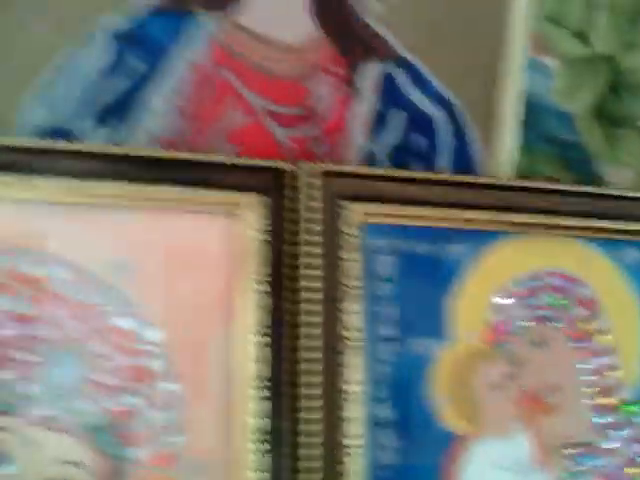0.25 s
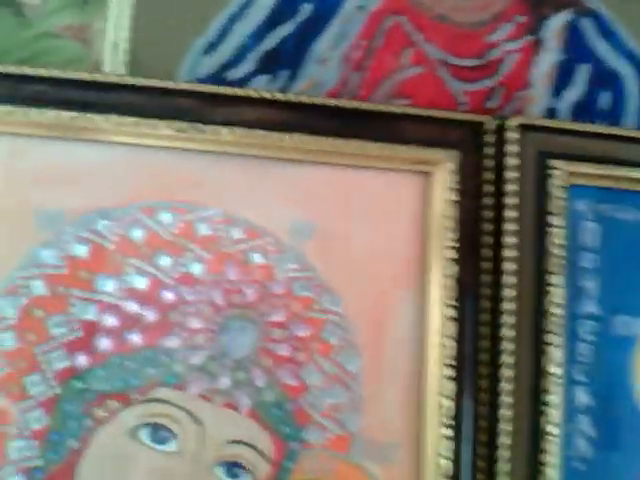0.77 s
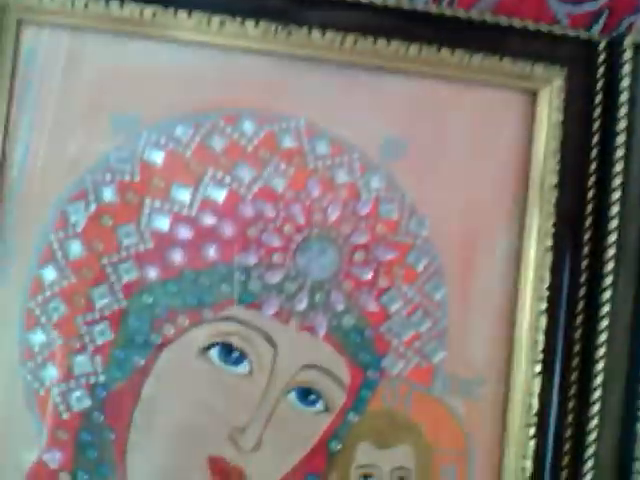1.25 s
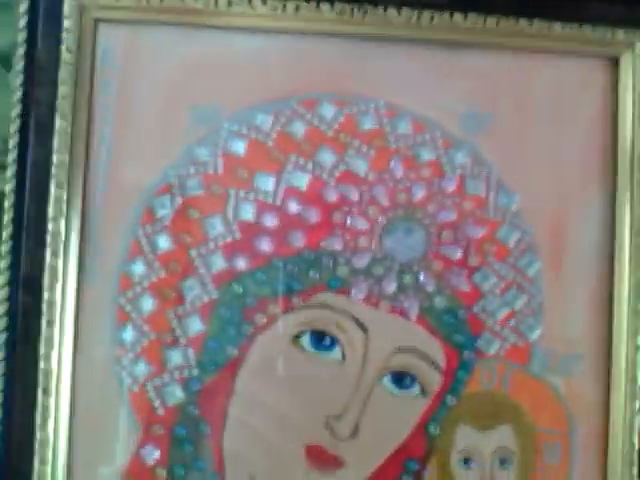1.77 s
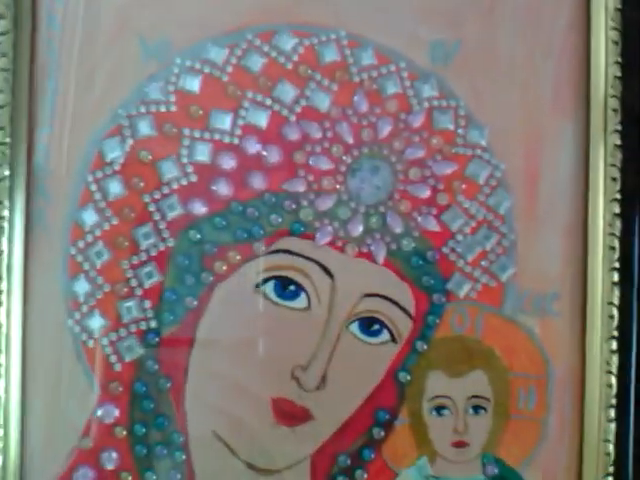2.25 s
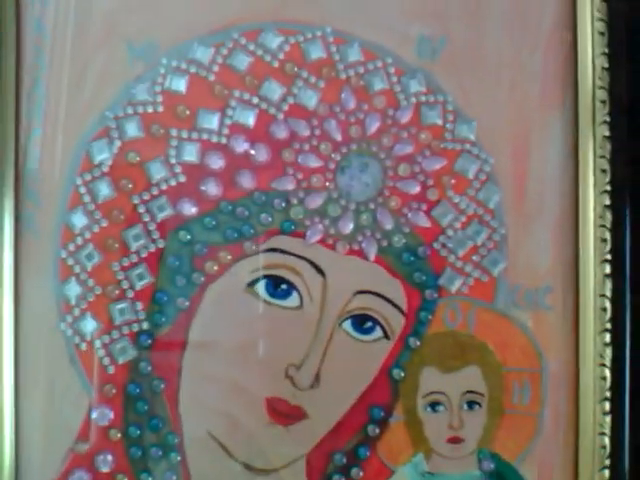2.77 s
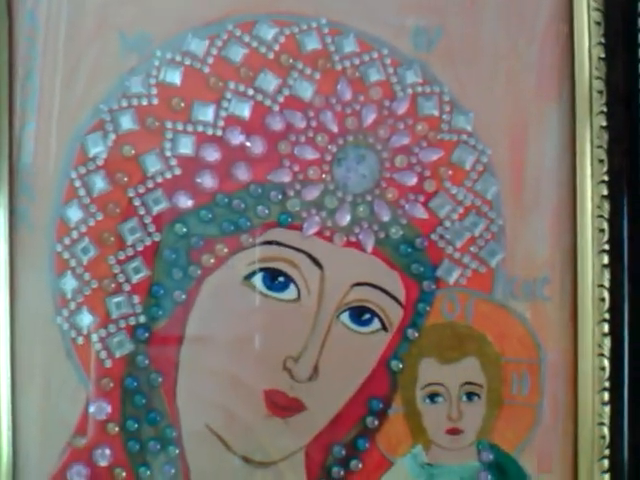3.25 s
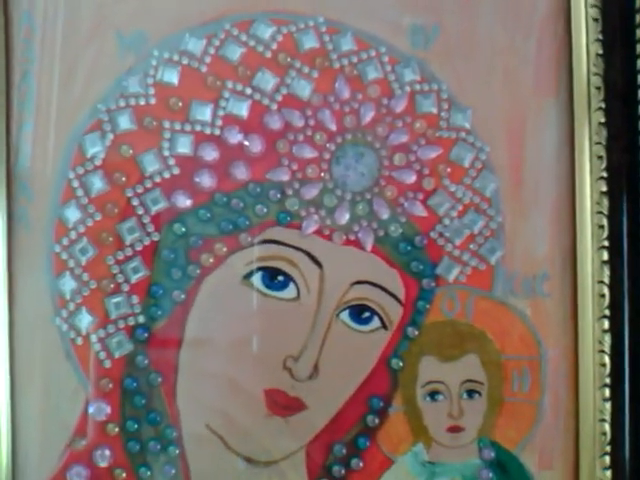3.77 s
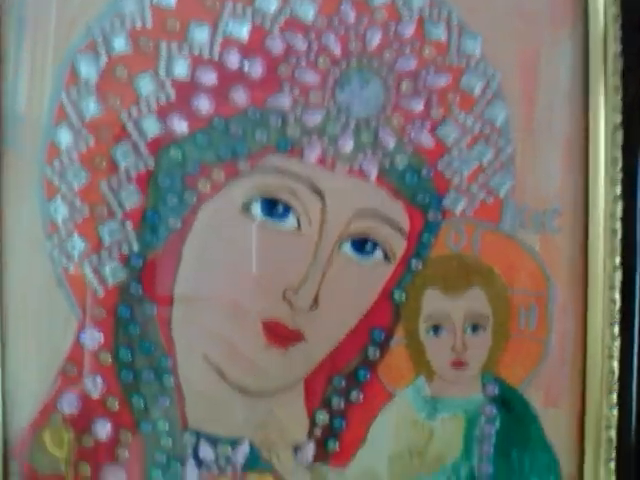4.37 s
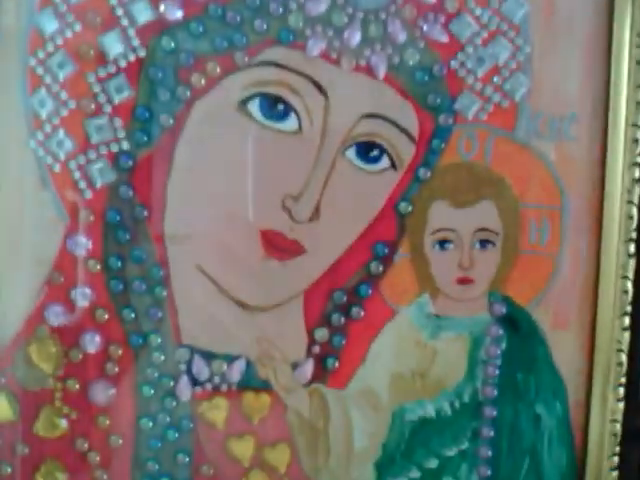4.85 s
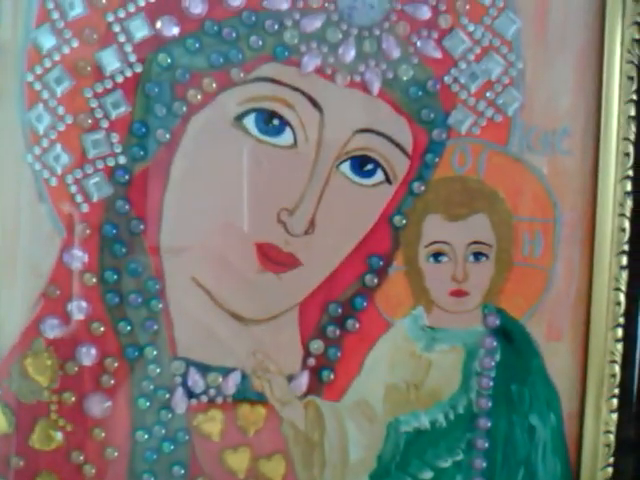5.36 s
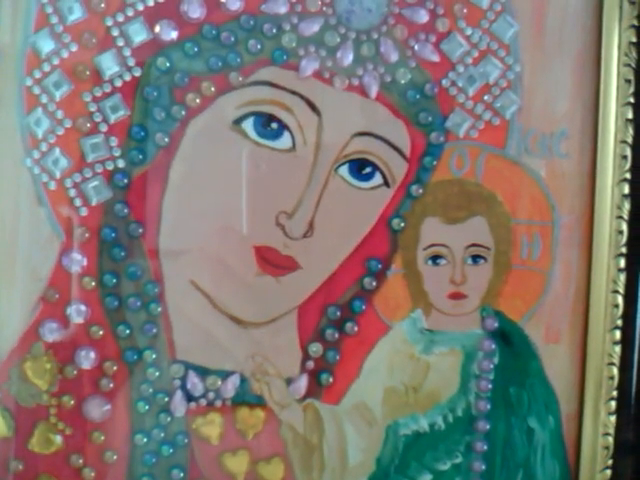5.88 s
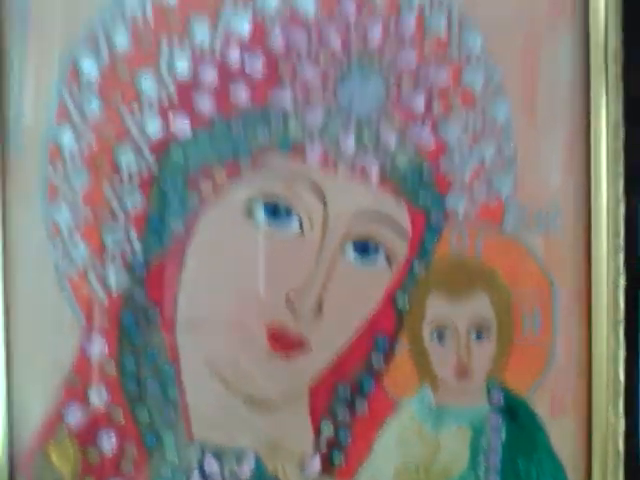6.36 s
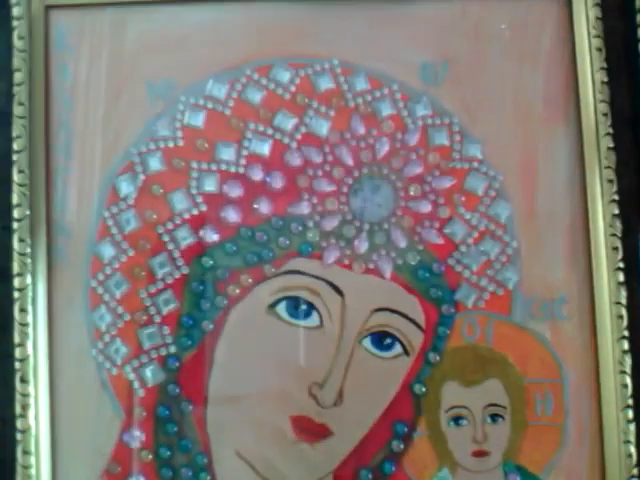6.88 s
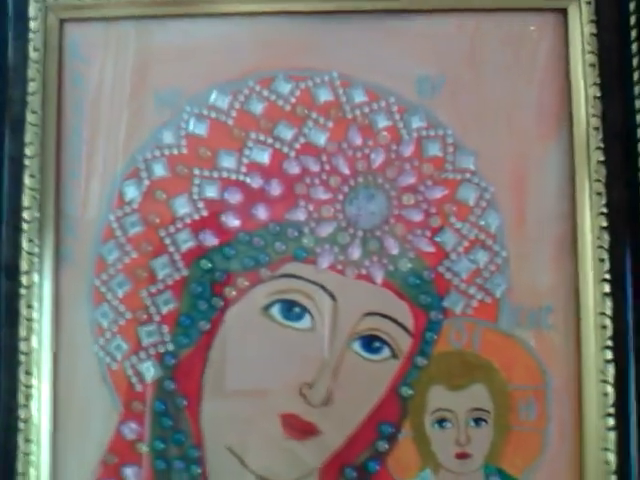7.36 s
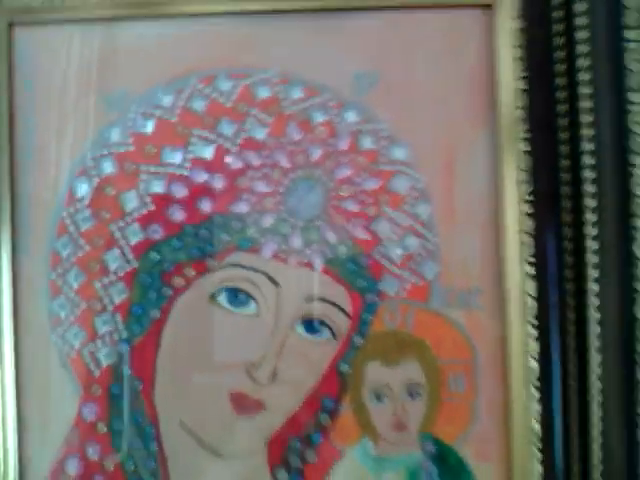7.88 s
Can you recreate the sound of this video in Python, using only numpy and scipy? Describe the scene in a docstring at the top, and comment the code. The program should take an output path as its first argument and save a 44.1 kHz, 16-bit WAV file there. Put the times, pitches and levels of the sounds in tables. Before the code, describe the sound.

A refrigerator hums with a steady throb while close fingers rub, click and thump on a plastic camera case.

```python
"""A throbbing refrigerator hum in a quiet room, over a low drone and an even hiss.
The compressor runs just behind the mains, so its orders beat at the motor's slip rate.
Close by, fingers shift on a hand-held camera: skin rubs and rasps over the plastic case,
which clicks, creaks and thumps against the microphone and ends with a hollow snap."""
import sys
import numpy as np
from scipy import signal
from scipy.fft import rfft, irfft, next_fast_len
from scipy.io import wavfile
from scipy.ndimage import map_coordinates

SR = 44100
rng = np.random.default_rng(int(sys.argv[2]) if len(sys.argv) > 2 else 0)


def unload_audio(sound):
    """Save the sound as a 16-bit wav file, at the path given as the first command line argument."""
    columns = np.transpose(np.atleast_2d(sound))
    # keep every value between -1 and 1, then stretch to whole-number steps
    steps = np.round(np.clip(columns, -1, 1) * 32767)
    wavfile.write(sys.argv[1], SR, steps.astype(np.int16))


N = 358091

# plastic case modes: centre_hz, width_hz, gain_db
CASE_MODES = [(473, 120, -1.5), (655, 138, 3.5), (1115, 160, -1.5), (1535, 444, 0), (1967, 564, -1),
              (2316, 190, -1.5), (2840, 450, -12), (3650, 880, -11.5), (4990, 1180, -13), (7150, 690, -19)]


def amp(db):
    """Decibels to gain."""
    return 10 ** (np.asarray(db) / 20)


def unit(x):
    """Scale to rms 1."""
    return x / np.sqrt(np.mean(x ** 2) + 1e-20)


def along(points, hz):
    """Interpolate (freq_hz, value) points on a log frequency axis."""
    freqs_hz, values = np.transpose(points)
    return np.interp(np.log(hz + 1), np.log(freqs_hz + 1), values)


def wobble(knots_per_s):
    """Smooth random curve."""
    knots = rng.standard_normal(int(N * knots_per_s / SR) + 4)
    return map_coordinates(knots, [np.arange(N) * knots_per_s / SR])


def filtered(x, response):
    """Apply a complex frequency response."""
    size = next_fast_len(len(x) + 8192)
    return irfft(rfft(x, size) * response(np.fft.rfftfreq(size, 1 / SR)), size)[:len(x)]


def noise(spectrum):
    """Coloured noise of rms 1."""
    return unit(filtered(rng.standard_normal(N), lambda hz: amp(along(spectrum, hz))))


def add(track, start_s, x):
    """Mix x into the track."""
    part = track[max(round(start_s * SR), 0):][:len(x)]
    part += x[:len(part)]


def room(x):
    """Wall reflections; the treble dies first."""
    decay = [(200, 0.59), (1500, 0.14), (8000, 0.13)]  # reverberation: freq_hz, t60_s
    hz, t, spectra = signal.stft(rng.standard_normal(SR // 2), SR, nperseg=256)
    tail = signal.istft(spectra * amp(-60 * t / along(decay, hz)[:, None]), SR, nperseg=256)[1]
    return signal.fftconvolve(x, np.pad(tail, (SR // 200, 0)) / np.linalg.norm(tail))[:N]


def background(drone_db=-47, air_db=-57):
    """The cabinet's low drone under an even hiss."""
    drone_spectrum = [(20, -28), (40, -19.5), (58, -11), (72, -11.5), (110, -5), (165, -1), (200, -2),
                      (270, -13), (400, -17), (520, -25), (800, -67.5)]  # freq_hz, relative_density_db
    air_spectrum = [(260, -22.5), (450, -3), (549, -5), (591, -7.5), (891, -9.5), (997, -9), (1130, -9.5),
                    (1260, -11.5), (1860, -15), (2380, -16.5), (3630, -22.5), (6930, -26), (8770, -47),
                    (11400, -80), (19300, -120)]  # freq_hz, relative_density_db
    return amp(drone_db) * noise(drone_spectrum) + amp(air_db) * noise(air_spectrum)


def hump(hz, centre_hz, peak_db, fall_db_per_oct):
    """Level in dB on the flank of a spectral hump."""
    return peak_db - fall_db_per_oct * abs(np.log2(hz / centre_hz))


def compressor_orders(stroke_hz, upper_crest_s=0.23, crest_swing_s=0.094):
    """Yield each order, the levels of its line and two slip sidebands, and its throb's crest time."""
    strong_orders = [(-52.5, -53, .18), (-35.5, -37.5, .19), (-45.5, -48, .19), (-39, -47.5, .29),
                     (-45, -53, 0.29), (-49, -57.5, .3), (-50, -54.5, .14), (-52, -57.5, 0.18)]  # third order upwards: line_db, sideband_db, crest_s
    # humps over the weaker lines: centre_hz, peak_db, fall_db_per_oct
    upper_lines = (360, -62, 29)
    upper_sidebands = (327, -53.5, 55)
    second_sidebands = (238, -56.5, 21)
    for row, order in enumerate(range(3, 20)):
        hz = order * stroke_hz
        if row < len(strong_orders):
            line_db, sideband_db, crest_s = strong_orders[row]
        else:
            line_db, sideband_db = hump(hz, *upper_lines), hump(hz, *upper_sidebands)
            crest_s = upper_crest_s + crest_swing_s * (-1) ** order  # even late, odd early
        yield order, (line_db, sideband_db, hump(hz, *second_sidebands)), crest_s


def compressor(mains_hz=49.985, stroke_hz=24.356, smear_rad=0.85, scatter_rad=0.45, waver_db=1.0):
    """Piston strokes mix with the motor's magnetic pull: each order beats with its slip sidebands."""
    buzz_lines = [(299.91, -55), (324.3, -57), (348.65, -56), (373.0, -68)]  # motor and cabinet buzz: pitch_hz, level_db
    t, hum = np.arange(N) / SR, np.zeros(N)
    slip_hz = 2 * mains_hz - 4 * stroke_hz
    for order, levels_db, crest_s in compressor_orders(stroke_hz):
        # the cabinet delays each order differently, smearing the strokes into a flutter
        offset_rad = smear_rad * (order - 4) ** 2 + scatter_rad * rng.standard_normal()
        stroke_rad = 2 * np.pi * order * stroke_hz * t + offset_rad
        slip_rad = 2 * np.pi * slip_hz * (t - crest_s)
        hum += sum(amp(db) * np.cos(stroke_rad + k * slip_rad) for k, db in enumerate(levels_db))
    buzz = sum(amp(db) * np.sin(2 * np.pi * (hz * t + rng.random())) for hz, db in buzz_lines)
    return np.sqrt(2) * (hum + buzz * amp(-waver_db * wobble(3)))


def movement(start_s, length_s, level_db, swell_db, attack_s=0.015, release_db_per_s=330):
    """Gain of a hand movement: attack, a hold that swells or fades through level_db, release."""
    t = np.arange(N) / SR - start_s
    hold_db = level_db + swell_db * (np.clip(t / length_s, 0, 1) - 0.5)
    return np.clip(t / attack_s, 0, 1) * amp(hold_db - release_db_per_s * np.maximum(t - length_s, 0))


def grip(shift_gain_db=-2, rest_db=-74):
    """The hand shakes the microphone, faintly at rest and more when it shifts."""
    shifts = [(.09, .07, -58, -1), (1.268, 0.085, -57, 1), (1.73, 0.046, -55, 3), (5.25, 0.65, -54.5, 2),
              (6.41, .07, -40, -1.5), (7.915, 0.18, -56, -1)]  # grip shifts: start_s, length_s, relative_db, swell_db
    gain = amp(rest_db) + amp(shift_gain_db) * sum(movement(*shift) for shift in shifts)
    return gain * noise([(15, -21), (35, -14.5), (57, -4.5), (68, -3.5), (110, -37.5), (300, -100)])


def resonances(modes, hz):
    """Causal response of (centre_hz, width_hz, gain_db) modes of alternating sign."""
    return sum((-1) ** k * amp(db) * 1j * hz * width / (centre ** 2 - hz ** 2 + 1j * hz * width)
               for k, (centre, width, db) in enumerate(modes))


def click(modes, level_db, tilt_db_per_oct, length_s, limit_hz, travel_s, grit=0.43):
    """Plastic lets go: a jolt and tiny slips ring its modes. Energy equals 10 ms at level_db."""
    t = np.arange(SR // 6) / SR
    slip_envelope = amp(-30 * t / length_s) * min(length_s * 100, 1)
    force = grit * rng.standard_normal(len(t)) * slip_envelope
    force[0] += 1  # the jolt

    def response(hz):
        tilt = amp(tilt_db_per_oct * np.log2(np.hypot(hz, 400) / 1000))
        contact = 1 / np.sqrt(1 + (hz / limit_hz) ** 6)  # a softer contact passes less treble
        # bending waves bring the treble first; travel_s is the delay at 1 kHz
        dispersion = np.exp(-4j * np.pi * travel_s * np.sqrt(1000 * hz))
        return resonances(modes, hz) * tilt * contact * dispersion

    x = filtered(force, response)
    return amp(level_db) * x / np.sqrt(np.sum(x ** 2) / (SR / 100) + 1e-20)


def rasp(grain_db=3, limit_hz=2700):
    """A fingertip slips coarsely along an edge, catching the case's middle modes."""
    strokes = [(1.992, 0.41, -72, -1), (6.453, 0.24, -50, -17.5), (7.7, .42, -57, 2)]  # edge strokes: start_s, length_s, level_db, swell_db
    modes = [(1490, 180, -7.5), (2260, 430, 0.5)]
    slips = rng.standard_normal(N) * amp(grain_db * wobble(300))
    edge = unit(filtered(slips, lambda hz: resonances(modes, hz) / (1 + (hz / limit_hz) ** 8)))
    return edge * sum(movement(*stroke) for stroke in strokes)


def ticks(rub_gain, ticks_per_s=4.3, relative_db=-3, scatter_db=1):
    """Sliding skin catches at random, the louder the harder it rubs."""
    track = np.zeros(N)
    for position, size in rng.random((round(ticks_per_s * N / SR), 2)):
        db = relative_db + scatter_db * (2 * size - 1)
        tick = click(CASE_MODES, db, tilt_db_per_oct=-2.5, length_s=0.0065, limit_hz=4500, travel_s=8e-4)
        add(track, position * N / SR, rub_gain[int(position * N)] * tick)
    return track


def fingers(grain_db=0.5, flutter_db=1.26, split_hz=3000, hiss_swell_ratio=1.5):
    """Skin drags over the case in fine uneven slips: hollow rub below, dry hiss above, small ticks."""
    strokes = [(0, .12, -54.5, 2, -7), (0.717, 0.027, -51.5, -1, -7.5), (0.845, 0.019, -33.5, -4.5, -10),
               (0.912, 0.11, -51, 5.5, -6), (1.017, 0.031, -42.5, 1, -5), (1.08, 0.029, -42, -7.5, -4),
               (1.153, 0.13, -47, 3, -8.5), (1.282, .45, -33.5, -3.5, -6), (1.798, 0.12, -34.5, -1.5, -9),
               (1.936, 0.12, -47.5, 3.5, -13.5), (2.086, .35, -51.5, 5, -16.5),
               (4.379, 0.28, -52, -10, -11), (6.462, .2, -50, -12.5, -7), (6.863, 0.033, -55, -3, -9),
               (7.7, 0.27, -57, 7, -10.5), (7.92, 0.21, -51.5, -5, -8.5)]  # finger strokes: start_s, length_s, rub_db, swell_db, hiss_re_rub_db
    friction_spectrum = [(200, -32.5), (350, -10), (480, -2.5), (630, 5), (920, -7), (1250, 2.5),
                         (1550, -0.5), (1900, -3), (2250, -3), (3000, -11), (4600, -12), (6700, -22.5),
                         (8000, -36), (9500, -58)]  # freq_hz, relative_density_db
    rub_gain, hiss_gain = np.zeros((2, N))
    for start_s, length_s, rub_db, swell_db, hiss_re_rub_db in strokes:
        rub_gain += movement(start_s, length_s, rub_db, swell_db)
        hiss_gain += movement(start_s, length_s, rub_db + hiss_re_rub_db, hiss_swell_ratio * swell_db)
    slips = rng.standard_normal(N) * amp(grain_db * wobble(560) + flutter_db * wobble(65))
    lowpass = lambda hz: 1 / (1 + (hz / split_hz) ** 8)
    rub = unit(filtered(slips, lambda hz: amp(along(friction_spectrum, hz)) * lowpass(hz)))
    hiss = unit(filtered(slips, lambda hz: amp(along(friction_spectrum, hz)) * (1 - lowpass(hz))))
    return rub_gain * rub + hiss_gain * hiss + ticks(rub_gain)


def ring(pitch_hz, t60_s, attack_s):
    """One damped mode with a soft start, peak 1."""
    t = np.arange(SR // 5) / SR
    envelope = amp(-60 * t / t60_s) * (1 - np.exp(-(t / attack_s) ** 2))
    x = np.sin(2 * np.pi * pitch_hz * t) * envelope
    return x / np.abs(x).max()


def case_bumps():
    """Finger pads thump the camera's low mode; fingertips knock on stiffer spots."""
    thumps = [(0.476, -18), (.688, -24), (.736, -17), (1.302, -14), (1.348, -17), (1.754, -15.5),
              (1.814, -21), (4.285, -21.5)]  # start_s, peak_db
    knocks = [(1.282, -19.5, 270, 0.019), (1.818, -13, 362, 0.0047), (6.413, -29, 487, .027),
              (6.44, -30.5, 410, 0.037), (7.93, -26.5, 289, 0.063)]  # start_s, peak_db, pitch_hz, t60_s
    track = np.zeros(N)
    for start_s, peak_db in thumps:
        add(track, start_s, amp(peak_db) * ring(pitch_hz=163.3, t60_s=0.047, attack_s=0.0067))
    for start_s, peak_db, pitch_hz, t60_s in knocks:
        add(track, start_s, amp(peak_db) * ring(pitch_hz, t60_s, attack_s=0.91 / pitch_hz))
    return track


def case_clicks(creak_s=0.019, jolt_s=0.00094, let_go_db=-24, transition_db=2.4, room_db=-23):
    """Clicks and dull taps ring the case. A light contact creaks on, a hard one lets go at once."""
    clicks = [(.109, -43.5, -8, 6050), (.683, -28.5, -3.5, 7100), (.8465, -34.5, -2.5, 5500),
              (1.081, -43, -2, 4500), (1.2789, -14, -.5, 5400), (1.294, -24, 1, 5960),
              (1.301, -25, 2, 6950), (1.3453, -24, 1.5, 5000), (1.7507, -11.5, 1, 8000),
              (2.605, -42, 1.5, 5960), (3.044, -31.5, 3, 3940), (3.062, -29.5, 2, 3980),
              (4.056, -37.5, 0.5, 5340), (4.226, -43, 0, 2180), (4.2847, -19, 2.5, 2360),
              (4.304, -45, 5, 6500), (4.352, -41.5, 0.5, 7000), (4.542, -47.5, 2, 5960),
              (4.662, -44, 2.5, 6500), (4.713, -43, 2.5, 3460), (4.782, -48, 1.5, 3500),
              (6.411, -33, 1, 5760), (6.443, -39.5, 4, 5430), (7.648, -47.5, 1.5, 2520)]  # start_s, level_db, tilt_db_per_oct, limit_hz
    taps = [(1.817, -27.5, -4), (2.292, -38.5, -7), (2.734, -47.5, -3), (2.767, -46, -5),
            (2.789, -40.5, -12.5), (2.812, -39.5, -11)]  # start_s, level_db, tilt_db_per_oct
    track = np.zeros(N)
    for start_s, db, tilt, limit_hz in clicks:
        length_s = jolt_s + creak_s / (1 + np.exp((db - let_go_db) / transition_db))
        add(track, start_s, click(CASE_MODES, db, tilt, length_s, limit_hz, travel_s=0.000802))
    for start_s, db, tilt in taps:
        tap = click(CASE_MODES, db, tilt, length_s=0.0046, limit_hz=3000, travel_s=0.000785)
        add(track, start_s, tap)
    return track + amp(room_db) * room(track)


def shell_snap(room_db=-16):
    """The hollow shell catches, gives and slaps home, sounding out into the room."""
    shell_modes = [(396, 76, 5.5), (560, 116, -1), (755, 130, -3), (1135, 81, 3), (1560, 177, -0.5),
                   (2380, 345, -3), (2620, 240, -7), (3430, 610, -19.5), (4800, 410, -28),
                   (5960, 1000, -37.5)]  # centre_hz, width_hz, gain_db
    jolts = [(7.9247, -21.5), (7.927, -11.5), (7.93, -17.5)]  # start_s, level_db
    track = np.zeros(N)
    for start_s, level_db in jolts:
        add(track, start_s, click(shell_modes, level_db, tilt_db_per_oct=-0.5, length_s=0.0053,
                                  limit_hz=7150, travel_s=0.00077, grit=0.27))
    return track + amp(room_db) * room(track)


def scene():
    """Refrigerator, room and hand at one microphone."""
    steady = compressor() + background()
    hand = case_clicks() + case_bumps() + shell_snap() + fingers() + rasp() + grip()
    return (steady + hand)[None]


def record(dry):
    """The camera rounds off peaks just under full scale and cuts the top treble."""
    ceiling, limit_hz = 0.95, 8600
    rounded = dry[0] / (1 + (dry[0] / ceiling) ** 6) ** (1 / 6)
    return filtered(rounded, lambda hz: 1 / np.sqrt(1 + (hz / limit_hz) ** 80))[None]


dry = scene()
out = record(dry)
unload_audio(out)
```